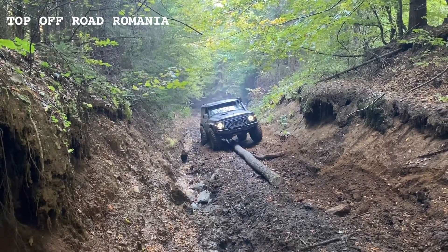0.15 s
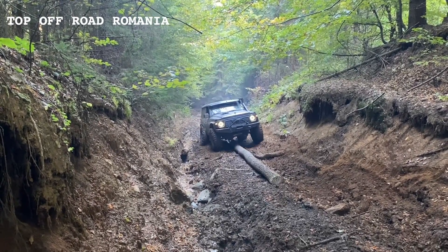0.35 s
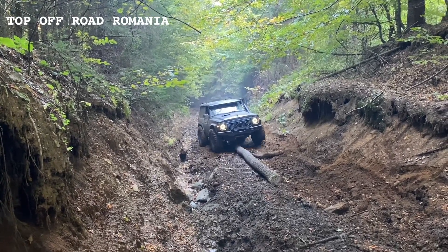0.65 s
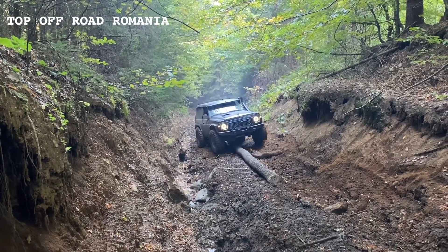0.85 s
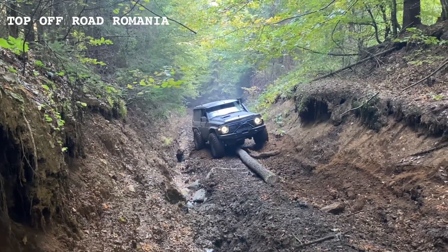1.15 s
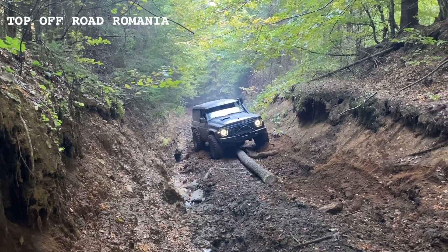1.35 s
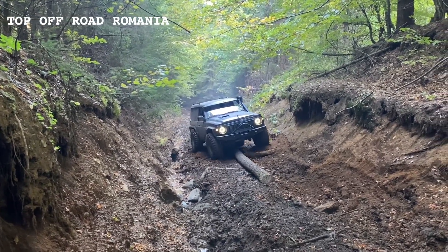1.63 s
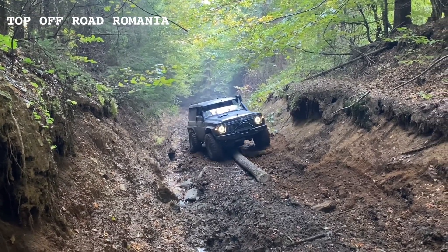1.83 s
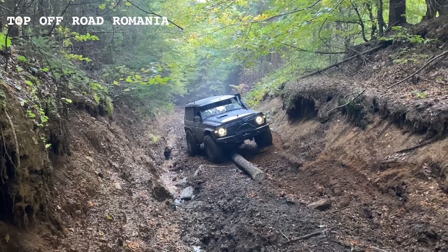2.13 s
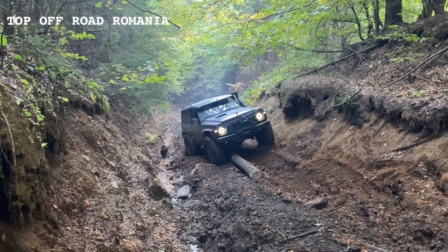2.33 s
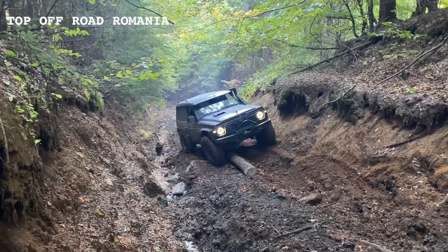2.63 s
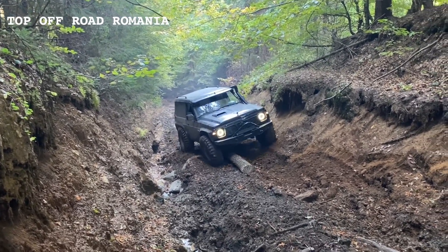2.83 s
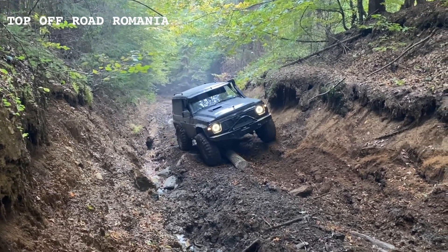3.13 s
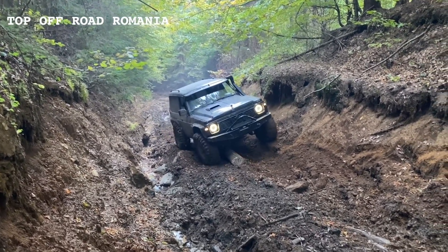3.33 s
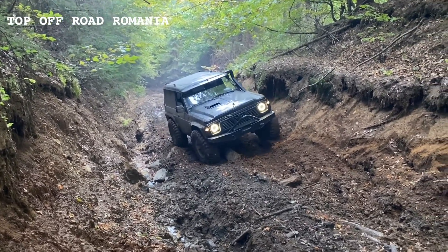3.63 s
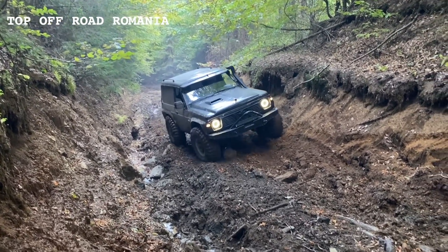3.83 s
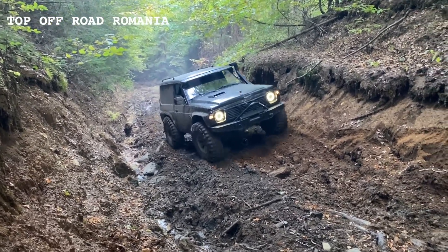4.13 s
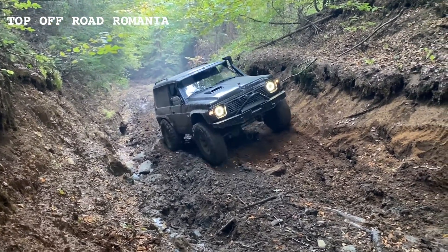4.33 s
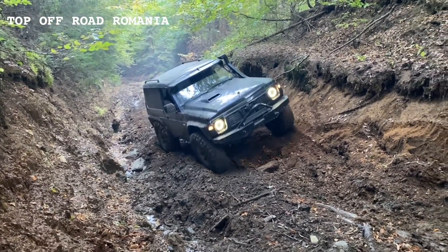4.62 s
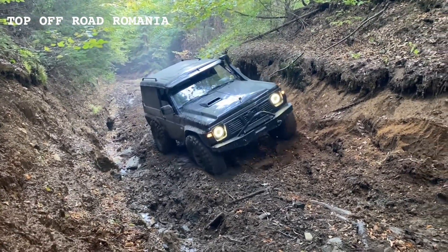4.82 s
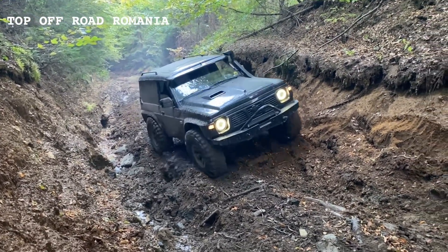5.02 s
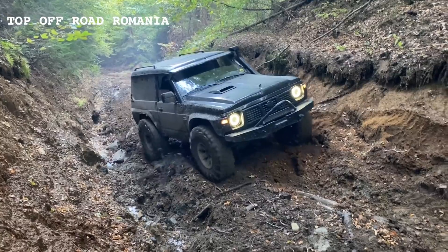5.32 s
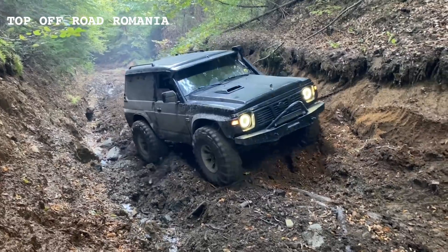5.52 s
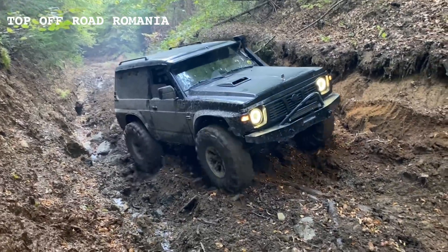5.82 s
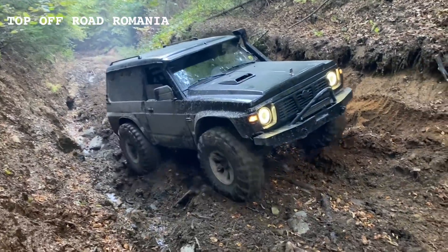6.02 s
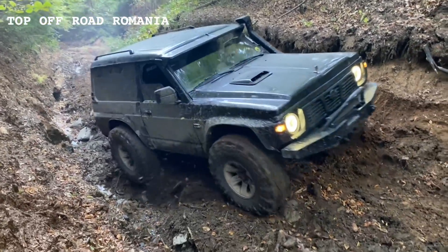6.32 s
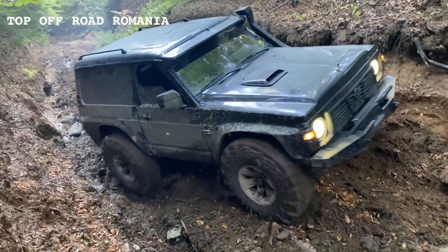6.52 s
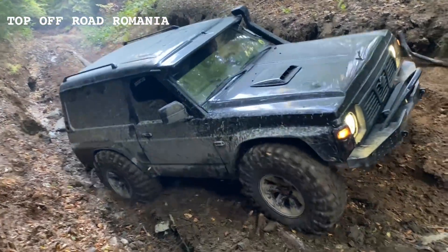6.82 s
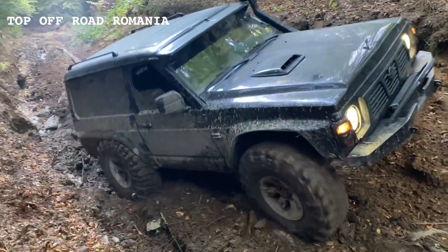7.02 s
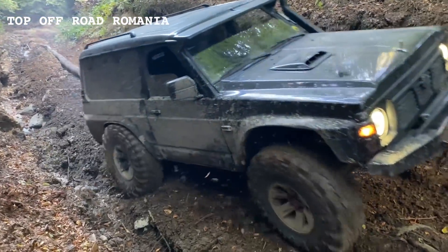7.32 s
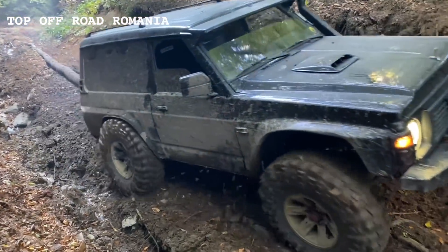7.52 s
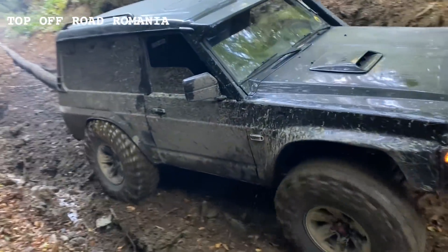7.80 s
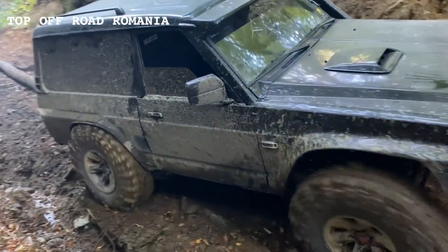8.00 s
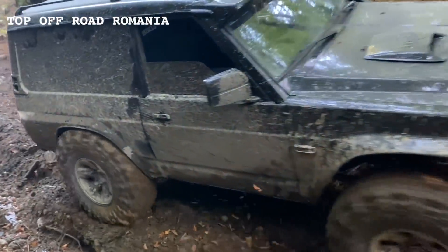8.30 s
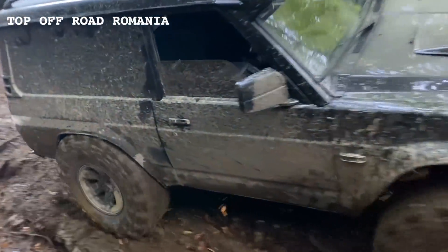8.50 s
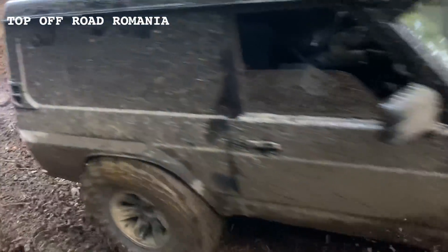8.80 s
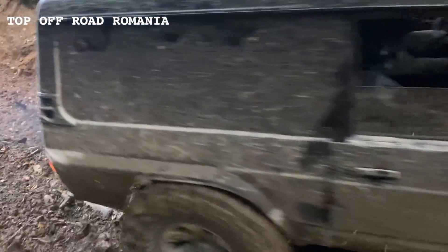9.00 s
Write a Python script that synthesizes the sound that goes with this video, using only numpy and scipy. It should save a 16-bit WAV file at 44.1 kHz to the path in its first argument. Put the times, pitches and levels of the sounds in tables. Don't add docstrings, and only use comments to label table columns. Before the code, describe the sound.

Outdoors in a forest gully, a handheld phone hears a six-cylinder diesel some distance off, pumped in short bursts with a faint high turbo whistle. It approaches steadily: revs jump higher, exhaust booms and barks unevenly, the block clatters, tyres slip and mud hisses. By the end it fills the stereo picture, dips, then lunges upward again, with gear whine, dry snaps and overloaded bass.

```python
import sys
import numpy as np
from scipy import signal
from scipy.fft import rfft, irfft, next_fast_len
from scipy.io import wavfile
from scipy.ndimage import uniform_filter1d, map_coordinates

SR = 44100
rng = np.random.default_rng(int(sys.argv[2]) if len(sys.argv) > 2 else 0)


def rack_gain(trim_db):
    fader = np.asarray(trim_db, float)
    return 10 ** (fader / 20)


def dump_mix(stems):
    frames = np.atleast_2d(stems).T
    limited = np.clip(frames, -1, 1)
    pcm = np.round(limited * 32767).astype(np.int16)
    wavfile.write(sys.argv[1], SR, pcm)


N = 403498

# start_s, gain_db
APPROACH = [(0, 1), (.9, 2.5), (1.8, 4), (2.6, 5), (3.5, 5.5), (4.5, 8), (5.4, 10), (6.5, 12), (7.5, 14),
            (9.15, 9)]


def unit(x):
    return x / np.sqrt(np.mean(x ** 2) + 1e-20)


def clock():
    return np.arange(N) / SR


def along(points, hz):
    f, v = np.transpose(points)
    return np.interp(np.log(hz + 1), np.log(f + 1), v)


def curves(rows):
    s, *cols = np.transpose(rows)
    return [np.interp(clock(), s, c) for c in cols]


def wobble(rate):
    knots = rng.standard_normal(int(N * rate / SR) + 4)
    return map_coordinates(knots, [np.arange(N) * rate / SR])


def white():
    return rng.standard_normal((2, N))


def filtered(x, response):
    m = next_fast_len(N + 8192)
    return irfft(rfft(x, m) * response(np.fft.rfftfreq(m, 1 / SR)), m)[..., :N]


def coloured(x, spectrum):
    y = filtered(x, lambda hz: rack_gain(along(spectrum, hz)))
    return y / np.sqrt(np.mean(y ** 2, axis=-1, keepdims=True))


def tone(turns, blur, rate):
    return np.sqrt(2) * np.sin(2 * np.pi * turns + blur * wobble(rate))


def singer(hz, db, blur, rate, flutter_db):
    turns = np.cumsum(uniform_filter1d(hz, SR // 14)) / SR
    return rack_gain(db + flutter_db * wobble(rate / 5)) * tone(turns, blur, rate)


def held(spans, values, rest):
    t = clock()
    return np.select([(t >= a) & (t < b) for a, b in spans], values, rest)


def lagging(goal, rise_s, fall_s, size=100):
    out = goal[::size].astype(float)
    for i in range(1, len(out)):
        gap = out[i] - out[i - 1]
        lag_s = rise_s if gap > 0 else fall_s
        out[i] = out[i - 1] + gap * size / SR / lag_s
    return np.interp(np.arange(N), np.arange(len(out)) * size, out)


def nearness():
    # start_s, share of the close colour (0-1)
    closing = [(0, 0), (3.5, 0.19), (5.5, 0.5), (7.5, 0.67), (9.15, 0.93)]
    return curves(closing)[0]


def slipping(events):
    rise_s, fall_s = 0.12, 0.089
    t = clock()[::100]
    extra_db = sum(db * np.exp(-((t - s) / np.where(t < s, rise_s, fall_s)) ** 2) for s, db in events)
    return np.interp(clock(), t, extra_db)


def driving():
    # down_s, up_s, firing rate after down_hz, firing rate after
    # up_hz, push_db
    pedal = [(-.05, 0.002, 87.2, 84.2, -17.5), (0.298, 0.437, 82.5, 87.6, -13),
             (0.436, 0.968, 87.1, 87.2, -12.5), (1.379, 1.659, 79.7, 93.1, -12.5),
             (1.664, 1.942, 92.5, 92.7, -11.5), (1.944, 2.16, 93.1, 101.5, -10.5),
             (2.165, 2.271, 101.5, 103.3, -15), (2.28, 2.401, 103.2, 104.8, -12.5),
             (2.519, 2.76, 102.4, 91.2, -13.5), (2.818, 3.25, 92.05, 91.2, -11.5),
             (3.289, 3.5, 87.75, 76.96, -16), (3.502, 3.83, 77, 103.6, -10.5),
             (3.929, 4.036, 103.7, 104.6, -11.5), (4.043, 4.287, 103.7, 123, -8.5),
              (4.468, 4.811, 102.6, 105.5, -10), (4.81, 4.926, 105.5, 101.5, -13),
              (4.929, 5.113, 100.4, 124.1, -8), (5.12, 5.288, 124.6, 142.9, -13.5),
              (5.441, 5.551, 118, 132, -9), (5.554, 5.661, 131.6, 139, 2.5), (5.66, 5.78, 138, 141.6, -7.5),
              (5.785, 5.885, 140.9, 147.1, 4.5), (5.93, 6.076, 144.5, 137.6, -7),
              (6.203, 6.424, 110, 114, -7.5), (6.699, 6.981, 87.16, 75.6, -9.5), (6.98, 7.2, 75.4, 99, -7),
              (7.42, 7.648, 63.66, 94.2, -6), (7.652, 8.043, 94.1, 130.3, -8.5),
              (8.19, 8.481, 116, 152.5, -6), (8.479, 8.817, 151.9, 166.2, -12.5),
              (8.97, 9.05, 151, 147.4, 4)]
    # firing_rate_hz, level_db
    overrun = [(80, -17), (90, -18.5), (105, -20), (120, -25), (140, -31), (165, -12)]
    # peak_s, extra_db
    slips = [(.85, 0.5), (1.85, 0), (3.2, 1), (3.8, 1.5), (4.28, 3), (5.27, 3.5), (5.6, 3), (5.88, 3),
             (6.25, 1.5), (6.42, 0.5), (6.7, 2), (7.12, 3), (7.78, 2), (8.0, 4), (8.42, 3), (8.58, 4),
             (8.81, 3), (9.07, 2.5)]
    slip_share = {"rumble": .02, "bark": 1.27, "clatter": 0.92, "hiss": 0.67}
    layers = {"rumble": (-46, .5, -1, .002, 2.5), "bark": (-47, 1.0965, 13.5, 0.0482, 1),
              "clatter": (-37.5, 0.9974, -3.3, 0.065, 2.5), "hiss": (-41.5, 0.9513, -0.66, 0.07, 3.5)}
    cruise_hz, strain_span_hz = 87.5, 46.8
    down, up, low_hz, high_hz, push_db = np.transpose(pedal)
    close = nearness()

    moments = np.ravel([down, up], order="F")
    rates_hz = np.ravel([low_hz, high_hz], order="F")
    rate = np.interp(clock() - 0.05, moments, rates_hz)

    spans = list(zip(down, up))
    coasting_db = along(overrun, rate) - 13.5 * close ** 2
    push = lagging(held(spans, push_db, coasting_db), rise_s=0.067, fall_s=0.068)
    boom_db = push - 0.32 * np.maximum(rate - 115.5, 0)

    load = lagging(held(spans, np.ones(len(up)), 0), rise_s=0.095, fall_s=0.056)
    strain = load * np.clip((rate - cruise_hz) / strain_span_hz, 0, .85)
    gain_db, slip_db = curves(APPROACH)[0], slipping(slips)
    levels = {}
    for name, (far_db, share, close_db, per_hz, strain_db) in layers.items():
        distance_db = far_db + share * gain_db + close_db * close
        effort_db = per_hz * (rate - cruise_hz) + strain_db * strain
        levels[name] = distance_db + effort_db + slip_share[name] * slip_db
    return rate, boom_db, levels


def firings(turns, scatter_db):
    cylinders = [-4.5, 2, -9, -8.5, 1.5, -5]
    k = turns.astype(int)
    chance = rng.standard_normal(k[-1] + 1)[k]
    return rack_gain(np.take(cylinders, k, mode="wrap") + scatter_db * chance)


def exhaust(turns, rate, boom_db, levels):
    # pitch_hz, level_db
    second = [(130, -28), (165, -28.5), (185, -28.5), (210, -33), (250, -33.5), (330, -29.5)]
    third = [(200, -43), (270, -49), (320, -46), (360, -40), (420, -50)]
    # pitch_hz, level_db (per Hz)
    bark_colour = [(150, -48), (220, -4), (285, -0.5), (315, 0), (350, -1.5), (390, -1.5), (430, -7),
                   (500, -12.5), (700, -54)]
    rumble_colour = [(15, -41), (30, -22), (50, -0.5), (80, -8), (140, -1), (200, -3.5), (260, -23),
                     (400, -77)]
    chassis = [(40, -29), (58, -2), (78, 12.5), (100, -14), (140, -50.5)]
    # peak_s, extra_db
    jolts = [(3.9, 5), (4.38, 4), (5.32, 5.5), (5.55, 7), (5.75, 3), (5.95, 5), (6.3, 5), (6.5, 2.5),
             (7.35, 5.5), (8.03, 3.5), (8.78, 6), (9.07, 6.5)]
    close = nearness()
    rumble_db = levels["rumble"] + slipping(jolts)
    bark_db = levels["bark"] + 1.36 * wobble(6)

    second_db = along(second, 2 * rate) + 3 * close + 1.93 * wobble(6)
    second_db = second_db + (1.136 * close - .55) * np.maximum(boom_db + 14.5, -12)
    third_db = along(third, 3 * rate) + 19 * close + .3 * (boom_db + 12) + 3 * wobble(7)
    half_db = -58 + 22 * close + .4 * (boom_db + 1) + 2.7 * wobble(3.1)
    boom = rack_gain(boom_db) * tone(turns, blur=.14, rate=20)
    boom = boom + rack_gain(second_db) * tone(2 * turns, blur=.2, rate=20)
    boom = boom + rack_gain(third_db) * tone(3 * turns, blur=.4, rate=20)
    boom = boom + rack_gain(half_db) * tone(turns / 2, blur=0.74, rate=22)
    boom = boom + tail_pipe()
    shudder = coloured(rng.standard_normal(N), chassis)
    boom = boom + rack_gain(rumble_db + 4.5 + 13.0 * close) * shudder

    pulses = np.diff(np.floor(turns), prepend=0) * firings(turns, scatter_db=3.0)
    bark = 0.3 * coloured(pulses, bark_colour) * [[1], [0]] + 0.59 * coloured(white(), bark_colour)
    rumble = coloured(white(), rumble_colour) * rack_gain(2.8 * wobble(8))
    return boom * [[1], [0]] + rack_gain(bark_db + 2) * bark + rack_gain(rumble_db + 12.0) * rumble


def engine_noise(turns, far, near, knock, sharp, patchy_db):
    # start_s, ringing_hz, shadowed_hz
    bay = [(3.5, 2265, 3020), (3.9, 1760, 1580), (6.1, 1900, 1720), (6.5, 1370, 1680), (7.25, 1500, 1640),
           (8.1, 1650, 2650), (9.15, 1920, 2670)]
    hz, t, z = signal.stft(white(), SR, nperseg=1024)
    field = uniform_filter1d(rng.standard_normal(z.shape[1:]), 3, axis=0)
    field = uniform_filter1d(field, 9, axis=1)
    s, *bands = np.transpose(bay)
    ring_hz, shade_hz = [np.interp(t, s, c) for c in bands]

    def bump(centre_hz):
        return np.exp(-((hz[:, None] - centre_hz) / 110) ** 2)

    gain_db = patchy_db * unit(field) + 5.5 * bump(ring_hz) - 4.5 * bump(shade_hz)
    noise = signal.istft(z * rack_gain(gain_db), nperseg=1024)[1][:, :N]
    bursts = knock * firings(turns, scatter_db=5) * np.exp(-sharp * (turns % 1))
    noise = noise * (4 + bursts)
    close = np.clip(nearness(), 0, 1)
    return (1 - close) * coloured(noise, far) + close * coloured(noise, near)


def block(turns, rate, levels):
    # pitch_hz, level_db (per Hz)
    block_far = [(260, -44), (440, -8.5), (527, -9), (585, 2), (656, -6.5), (782, -1), (849, -9.5),
                 (938, -6), (1300, -17.5), (1690, -37), (2860, -120)]
    block_near = [(260, -42), (440, -4.5), (570, 1), (677, -1.5), (804, -1), (1100, -8.5), (1300, -3),
                  (1690, -5), (2860, -120)]
    pump_orders = (3.35, 6.7)
    # pitch_hz, level_db
    pump_housing = [(230, -54), (280, -51), (305, -46), (340, -51), (450, -58), (560, -47), (615, -41.5),
                    (690, -44.5), (780, -58)]
    # pitch_hz, level_db (against the clatter)
    fan_lines = [(282, -11.5), (405, -17), (565, -9.5), (965, -16.5)]
    close = nearness()
    clatter_db = levels["clatter"] + .6 * wobble(9)
    clatter = engine_noise(turns, block_far, block_near, knock=0.89, sharp=2.1, patchy_db=1.38)

    pump = np.zeros(N)
    for order in pump_orders:
        pump_db = along(pump_housing, order * rate) + 21.9 * np.minimum(close, .42) + 1.6 * wobble(6)
        pump += rack_gain(pump_db) * tone(order * turns, blur=.95, rate=14)

    fan = np.zeros(N)
    for hz, db in fan_lines:
        fan += rack_gain(db + 2.2 * wobble(4)) * tone(hz * clock(), blur=.35, rate=6)
    fan = fan * rack_gain(-9 * close ** 2)

    lines = pump + rack_gain(uniform_filter1d(clatter_db, SR)) * fan + gear_whine()
    return rack_gain(clatter_db) * clatter + lines * [[1], [0]]


def air(turns, hiss_db):
    # pitch_hz, level_db (per Hz)
    air_far = [(800, -24), (1200, 0), (1700, 2.5), (2300, -1.5), (2520, -2), (2770, 2), (4250, -3.5),
               (4800, -5.5), (6500, -12), (8300, -13.5), (10000, -23.5), (12200, -39), (13800, -73),
               (15500, -42)]
    air_near = [(800, -39), (1200, -12.5), (1600, -2.5), (2070, 2.5), (2670, -5), (3700, -9.5), (5500, -13),
                (6500, -14.5), (7500, -14), (8600, -13.5), (10000, -14), (12200, -23), (13800, -67),
                (15500, -23)]
    surge_colour = [(2400, -30), (3300, -5), (4200, 2), (4700, -1), (5400, -12), (6500, -7), (9300, -10),
                    (15500, -40)]
    rush = engine_noise(turns, air_far, air_near, knock=0.99, sharp=8.7, patchy_db=2.06)
    excess_db = hiss_db - uniform_filter1d(hiss_db, SR)
    grit = white() * rack_gain(2.5 * wobble(500))
    surge = rack_gain(2.1 * excess_db - 13) * coloured(grit, surge_colour)
    return rack_gain(hiss_db + 0.18 * wobble(17)) * (rush + surge)


def turbo():
    # start_s, end_s
    boost = [(.27, .95), (1.38, 2.27), (2.85, 3.24), (3.6, 3.99), (4.06, 4.12)]
    # start_s, pitch_hz, level_db
    spool = [(7.9, 9400, -88), (8.05, 9660, -39), (8.2, 10200, -44.5), (8.3, 10000, -35.5),
             (8.4, 10800, -75)]
    idle_hz, full_hz = 6820, 8400
    goal_hz = held([(0, 1e-4)] + boost, [7200] + [full_hz] * len(boost), idle_hz)
    hz = lagging(goal_hz, rise_s=.33, fall_s=.23)
    db = -63 + curves(APPROACH)[0] / 2 + 4 * (clock() > 3.97) + 1.8 * wobble(5)
    db = db - .008 * np.maximum(hz - 7900, 0)
    db = db - 250 * np.maximum(clock() - 4.2, 0)
    thin = rack_gain(-2) * singer(hz, db, blur=1.0, rate=70, flutter_db=2) * [[1.7], [.3]]
    return thin + singer(*curves(spool), blur=4.7, rate=390, flutter_db=3.5)


def twigs():
    # start_s, peak_db, pitch_hz, t60_s, left_right_db
    snaps = [
        (2.39, -27, 950, .02, 2),
        (4.097, -21, 720, .015, -1),
        (5.9152, -13, 8500, .003, -1),
        (6.907, -26, 9500, .004, -2),
        (6.9585, -15, 4200, .008, -3),
        (8.65, -18, 1500, .012, -2),
        (8.78, -20, 9500, .008, -1),
        (9.078, -23, 10000, .006, 2),
    ]
    out, t = np.zeros((2, N + SR)), np.arange(1200) / SR
    spread = rng.normal(0, 0.17, (len(snaps), 4, 1))
    for (s, db, hz, t60, pan_db), off in zip(snaps, spread):
        spray = np.sin(2 * np.pi * hz * np.exp(off) * t).sum(axis=0)
        modes = np.sin(2 * np.pi * hz * t) + 0.67 * spray
        snap = rack_gain(1 - 60 * t / t60) * (1 - np.exp(-t / .0003)) * modes
        out[:, round(s * SR):][:, :len(t)] += rack_gain(db + pan_db * np.array([[.5], [-.5]])) * snap
    return out[:, :N]


def tail_pipe():
    # peak_s, pitch_hz, peak_db
    crossings = [(5.86, 356.2, -18.5), (7.821, 352.4, -18.5), (7.971, 355.5, -17.5), (8.33, 255, -15),
                 (8.45, 338.3, -22.5), (8.58, 367.4, -16), (8.79, 329, -14), (9.04, 305, -18)]
    rise_db_per_s, fall_db_per_s = 230, 300
    t = clock()
    swells = []
    for s, _, peak_db in crossings:
        swells.append(peak_db - np.maximum(rise_db_per_s * (s - t), fall_db_per_s * (t - s)))
    db = np.array(swells)
    hz = np.transpose(crossings)[1][db.argmax(axis=0)]
    return singer(hz, db.max(axis=0), blur=0.11, rate=43, flutter_db=-3.5)


def gear_whine():
    # start_s, pitch_hz, level_db
    gears = [
        (6.4, 870, -60),
        (6.52, 845, -36),
        (6.97, 720, -38),
        (7.25, 690, -36),
        (7.45, 630, -37),
        (7.68, 650, -36),
        (7.85, 740, -31),
        (8.12, 880, -33),
        (8.2, 900, -60),
    ]
    return singer(*curves(gears), blur=.8, rate=30, flutter_db=2.5)


def ports(pair):
    # pitch_hz, likeness (0-1)
    alike = [(60, 1), (130, 0.94), (340, 0.96), (860, 0.78), (1400, 0.51), (1900, 0.37), (2900, 0.17),
             (4000, 0.73), (5400, 0.2), (6500, 0.49), (8500, 0.81), (10000, 1), (15000, 0.63)]
    # pitch_hz, left_right_db
    lean = [(60, -.3), (380, -2.5), (900, 0), (1900, -.8), (3000, 2.5), (5400, 0.5), (6600, -.8),
            (10000, -0.4)]
    # pitch_hz, lead_rad
    lead = [(60, .01), (860, .1), (1600, -.5), (2900, 1), (4000, .2), (6500, 0), (8300, -3.1),
            (10150, -6.28), (12000, -9.4), (13900, -12.56), (15500, -15.7)]
    half = np.array([[.5], [-.5]])

    def split(hz):
        angle = np.arccos(np.clip(along(alike, hz), -1, 1)) / 2
        return [np.cos(angle), np.sin(angle)]

    def offset(hz):
        return rack_gain(half * along(lean, hz)) * np.exp(1j * half * along(lead, hz))

    mid, side = filtered(pair, split)
    return filtered(np.array([mid + side, mid - side]), offset)


def scene():
    rate, boom_db, levels = driving()
    turns = np.cumsum(rate) / SR
    truck = exhaust(turns, rate, boom_db, levels) + block(turns, rate, levels) + air(turns, levels["hiss"])
    return ports(truck) + turbo() + twigs()


def band_limit(x):
    return signal.sosfilt(signal.butter(12, 15510, fs=SR, output="sos"), x)


def record(dry):
    soft = dry / (1 + np.abs(dry / .97) ** 6) ** (1 / 6)
    return band_limit(soft)


dry = scene()
out = record(dry)
dump_mix(out)
```